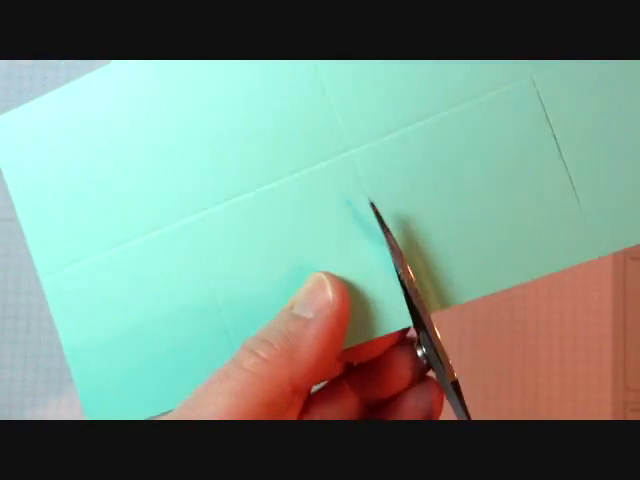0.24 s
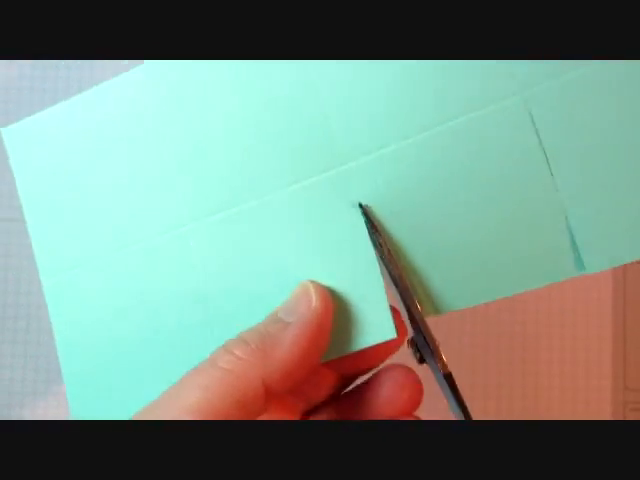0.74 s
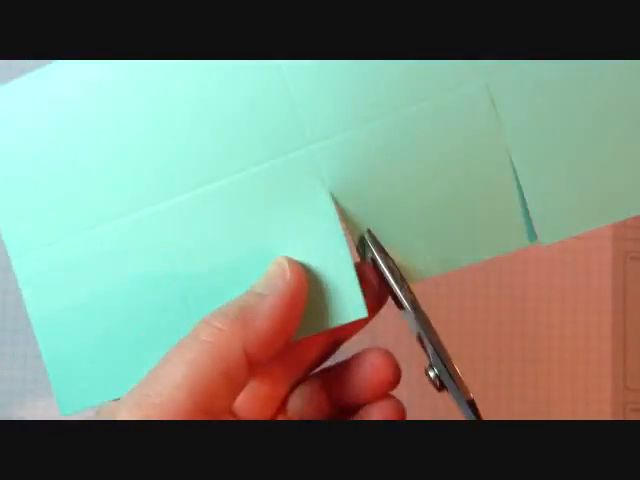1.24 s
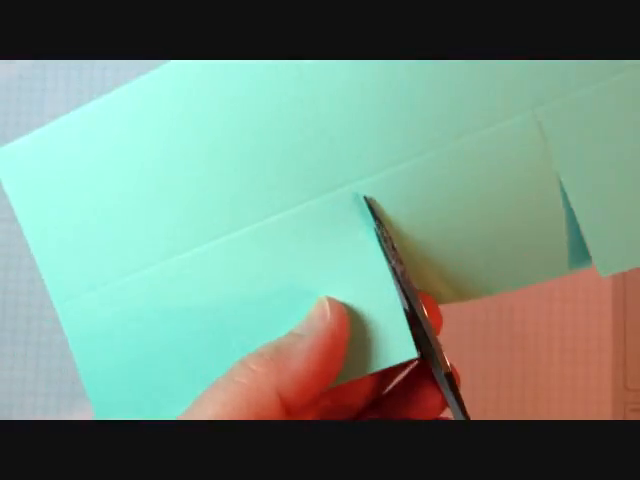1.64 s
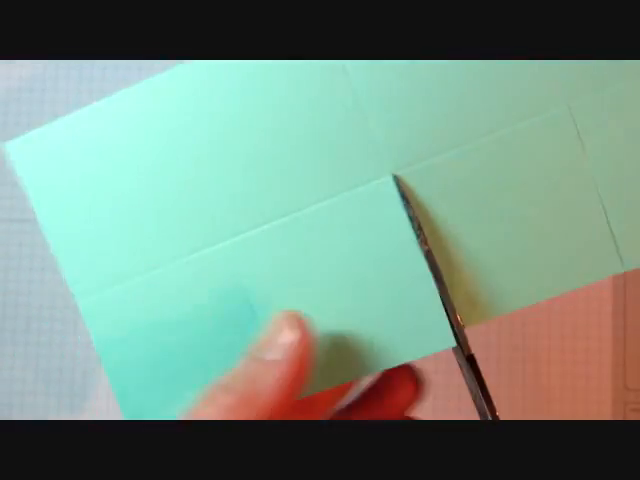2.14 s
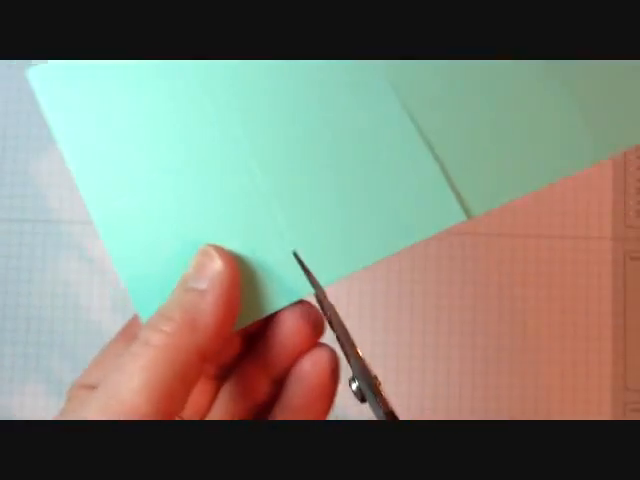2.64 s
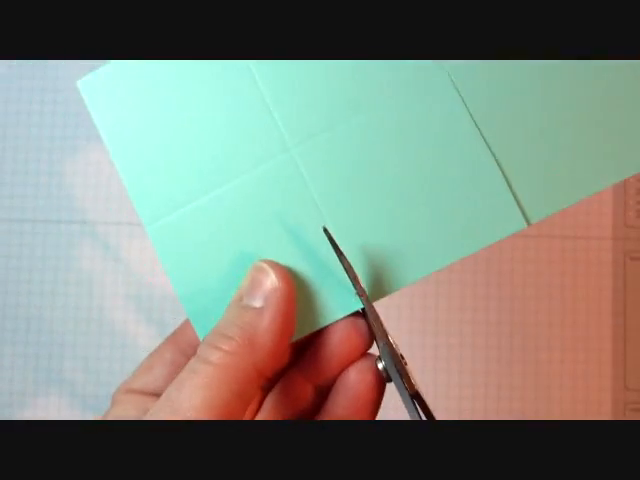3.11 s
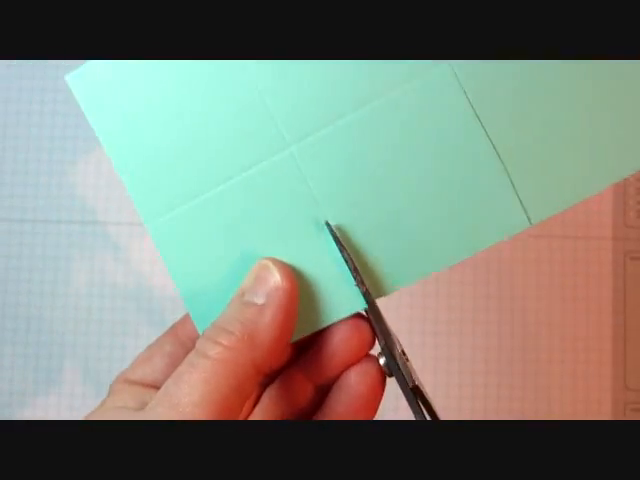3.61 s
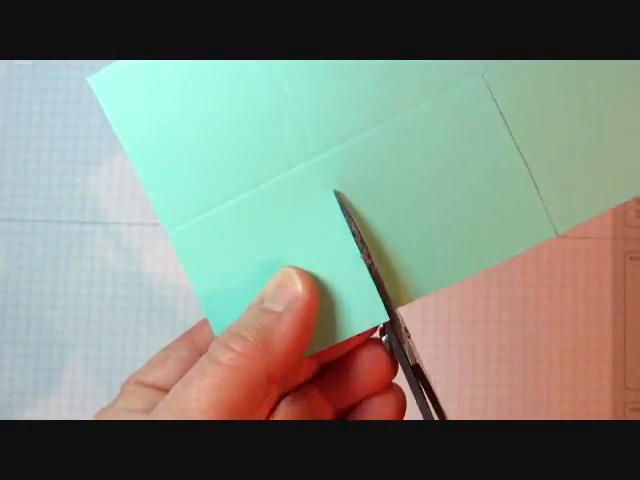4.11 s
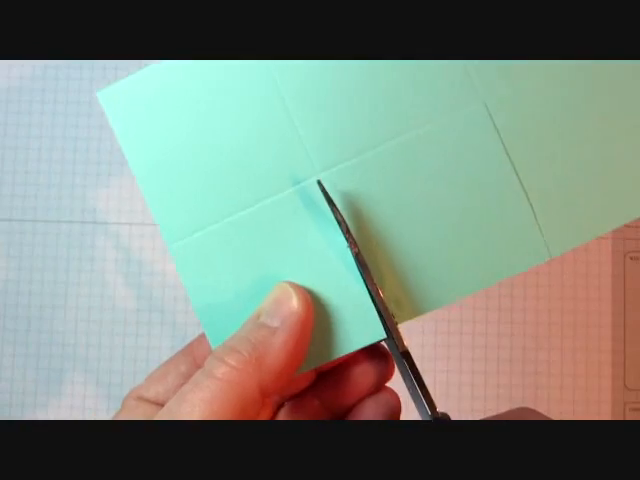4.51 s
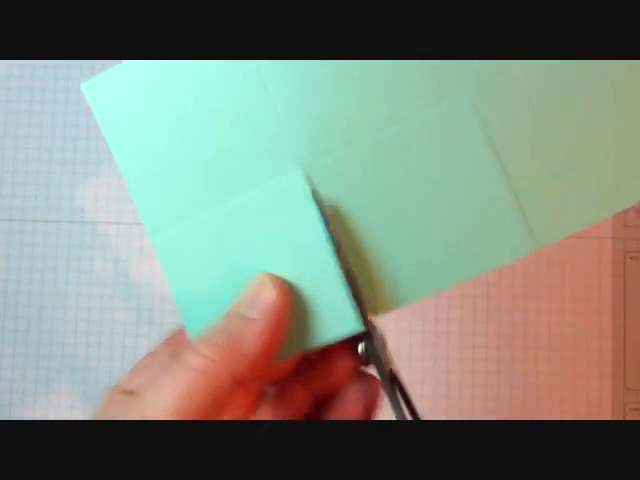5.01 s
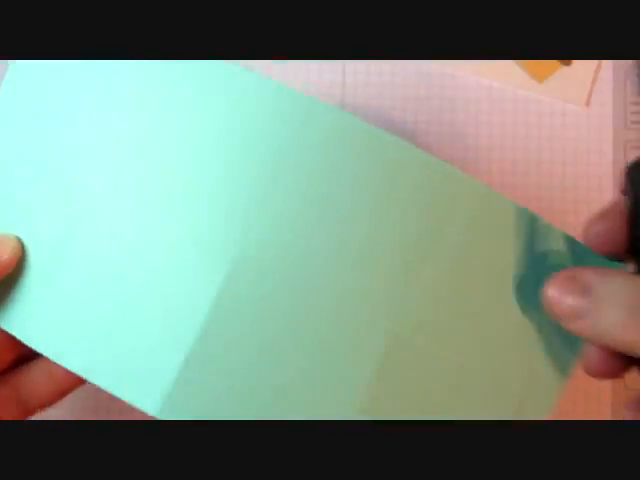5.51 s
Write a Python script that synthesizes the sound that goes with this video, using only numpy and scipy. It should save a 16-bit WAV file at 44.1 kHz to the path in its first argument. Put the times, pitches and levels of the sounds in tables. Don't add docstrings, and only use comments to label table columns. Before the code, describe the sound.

A close stereo pickup of scissors cutting stiff card at a table in a small room, with a very short diffuse echo. From 0 to 0.35 s, gritty crunching bites with papery squeaks; a small cut follows near 0.75. Around 0.9 to 1.3 the card rubs and the blades slide lightly with ticks. A crisp snap at 1.5 leads into dull scuffing and small cuts until 1.9, with a knock at 1.88. From 2.2 to 2.6 comes a dense run of rips and snaps, ending in low thuds of the bending sheet. It is nearly quiet from 2.9 to 3.5, with slight scrapes. A thin metallic rasp rises and falls at 3.55 to 3.75, then a very sharp crack at 3.92. More tearing follows around 4.2 to 4.3, the loudest snap at 4.45, faint rubbing, then crunchy cuts from 5.05 to 5.35 and a last light snip at 5.7. Faint hiss and very high whine persist throughout.

```python
import sys
import numpy as np
from scipy import signal
from scipy.fft import rfft, irfft
from scipy.io import wavfile
from scipy.ndimage import uniform_filter1d

SR = 44100
rng = np.random.default_rng(int(sys.argv[2]) if len(sys.argv) > 2 else 0)


def invert_db(level):
    return 10 ** (np.asarray(level, dtype=float) / 20)


def waveform_to_disk(signal):
    frames = np.transpose(np.atleast_2d(signal))
    scaled = np.clip(frames, -1, 1) * 32767
    samples = np.round(scaled).astype(np.int16)
    wavfile.write(sys.argv[1], SR, samples)


N = 253575


def unit(x):
    return x / np.sqrt(np.mean(x ** 2))


def shape_db(points, hz):
    point_hz, db = np.transpose(points)
    return np.interp(np.log(hz + 1), np.log(point_hz), db)


def bands(hz, centres_hz):
    return [np.interp(np.log(hz + 1), np.log(centres_hz), row) for row in np.eye(len(centres_hz))]


def walk(rate):
    k = int(SR / rate)
    held = np.repeat(rng.standard_normal(N // 20), k)[:N]
    return unit(uniform_filter1d(held, k))


def push(t, peak_s, rise_s, fall_s, db):
    rising = (peak_s - t) / max(rise_s, .002)
    falling = (t - peak_s) / max(fall_s, .002)
    away = np.where(t < peak_s, rising, falling)
    return invert_db(db - 23 * away ** 1.15) ** 2


def hiss(points, db):
    gain = invert_db(shape_db(points, np.fft.rfftfreq(N, 1 / SR)))
    return invert_db(db) * unit(irfft(rfft(rng.standard_normal(N)) * gain, N))


# [pitch_hz, level_db per Hz]
SIDE_HISS = [(15, -26), (25, -13), (64, -5), (97, -23), (134, -8.5), (384, -8.5), (575, -8.5), (936, -6.5),
             (1040, -7), (7920, -23.5), (16000, -33.5)]
# [pitch_hz, level_db per Hz]
MID_HISS = [(15, -22), (25, -6.5), (114, -10.5), (249, -6.5), (531, -13.5), (1190, -4.5), (1840, -13),
            (3250, -14), (4140, -14.5), (4490, -15.5), (16000, -24)]
# [pitch_hz, mid_db, side_db, start_turns]
WHINES = [
    (7866.8, -77, -77, 0),
    (15733.7, -75, -93, 0),
    (15747.8, -80, -98, .7),
]


def camera():
    turns = np.arange(N) / SR
    mid, side = hiss(MID_HISS, -57.5), hiss(SIDE_HISS, -46)
    for hz, mid_db, side_db, start_turns in WHINES:
        whine = np.sqrt(2) * np.sin(2 * np.pi * (hz * turns + start_turns))
        mid += invert_db(mid_db) * whine
        side += invert_db(side_db) * whine
    return mid, side


# [peak_s, rise_s, fall_s, level_db]
WRIST_LEANS = [(.9, .03, .15, -62), (1.02, .04, .06, -62), (1.18, .06, .1, -62), (1.51, .01, .2, -55),
               (1.65, .08, .15, -56), (2.75, .08, .1, -62), (4.1, .05, .08, -63), (4.455, .015, .2, -55),
               (5.14, .04, .05, -62), (4.68, .05, .08, -64), (5.74, .04, .05, -57)]


def leans():
    t = np.arange(N) / SR
    table = signal.butter(2, [80, 230], "bandpass", fs=SR, output="sos")
    rumble = unit(signal.sosfilt(table, rng.standard_normal(N)))
    power = sum(push(t[::100], *row) for row in WRIST_LEANS)
    return rumble * np.interp(t, t[::100], np.sqrt(power))


def echo(db, gap_s, top_hz):
    t, t60_s = np.arange(SR // 4) / SR, 0.14
    tail = rng.standard_normal(len(t)) * np.exp(-np.log(1000) * t / t60_s) * (t > gap_s)
    tail = signal.lfilter(*signal.butter(1, top_hz, fs=SR), tail)
    return invert_db(db) * tail / np.linalg.norm(tail)


# [time_s, resonance_hz, level_db]
BLADE_RASP = [
    (3.521, 3310, -64),
    (3.58, 3875, -45.5),
    (3.64, 4670, -45),
    (3.691, 5120, -41),
    (3.717, 4440, -44),
    (3.75, 4130, -68),
]


def rasp():
    time_s, hz, db = np.transpose(BLADE_RASP)
    t, width_hz = np.arange(N) / SR, 900
    rough = unit(signal.lfilter(*signal.butter(2, width_hz, fs=SR), rng.standard_normal(N)))
    turns = np.cumsum(np.interp(t, time_s, hz)) / SR
    return invert_db(np.interp(t, time_s, db, -120, -120)) * rough * np.sin(2 * np.pi * turns)


# [peak_s, rise_s, fall_s, peak_pitch_hz, level_db]
STRIP_SINGS = [(.272, .008, .01, 1600, -36), (.289, .005, .004, 3300, -33), (.137, .015, .02, 4100, -43),
               (.075, .03, .05, 600, -37), (2.237, .03, .02, 4200, -38), (2.298, .01, .015, 4200, -37),
               (2.325, .02, .015, 4300, -40), (2.356, .012, .02, 4150, -37), (4.25, .06, .08, 1300, -38),
               (4.26, .05, .07, 4600, -43), (1.63, .03, .03, 1700, -40), (1.725, .02, .04, 2200, -42),
               (1.73, .02, .04, 3300, -46), (1.865, .08, .025, 1300, -42), (1.85, .06, .04, 3000, -44),
               (1.89, .008, .06, 720, -42), (2.235, .03, .03, 870, -36), (2.298, .008, .045, 870, -34),
               (2.42, .04, .08, 420, -42), (2.555, .012, .01, 5900, -40), (2.576, .012, .045, 620, -27),
               (2.86, .008, .03, 560, -46), (3.875, .02, .04, 1450, -43), (3.94, .02, .04, 3400, -42),
               (3.965, .04, .04, 1000, -42), (4.025, .015, .04, 2000, -42), (4.475, .03, .04, 2200, -36),
               (5.075, .015, .04, 1230, -36), (5.14, .04, .04, 800, -36), (5.1, .02, .02, 1100, -37),
               (1.59, .06, .06, 4600, -44), (1.53, .03, .04, 1400, -40), (2.355, .01, .03, 900, -35),
               (1.77, .015, .012, 1300, -32), (5.117, .01, .015, 1750, -35), (5.27, .02, .04, 1300, -40),
               (5.31, .02, .03, 1250, -35), (5.355, .02, .02, 2350, -42)]


def sings():
    sag_per_s, width_hz = 1.2, 230
    t, out = np.arange(-SR // 8, SR // 8) / SR, np.zeros(N + SR)
    noise = rng.standard_normal((len(STRIP_SINGS), len(t)))
    rough = unit(signal.lfilter(*signal.butter(2, width_hz, fs=SR), noise))
    for (peak_s, rise_s, fall_s, hz, db), grain in zip(STRIP_SINGS, rough):
        i = int(peak_s * SR)
        turns = np.cumsum(hz * np.exp(-sag_per_s * t)) / SR
        swell = np.sqrt(2 * push(t, 0, rise_s, fall_s, db))
        out[i:i + len(t)] += swell * grain * np.sin(2 * np.pi * turns)
    return out[SR // 8:N + SR // 8]


# [peak_s, rise_s, fall_s, card_db, blades_over_card_db]
CUT_STROKES = [(.07, 0.062, 0.12, -32.5, -2), (.14, 0.12, 0.04, -43, 7.5), (.28, 0.027, .04, -38.5, 1),
               (.456, 0.071, 0.31, -54, -5), (.682, 0.046, 0.1, -56, 7), (.775, 0.028, 0.067, -38, 2.5),
               (1.775, 0.025, 0.008, -39, 11.5), (2.23, 0.075, 0.12, -39, 1), (2.325, .04, .02, -39, 7),
               (2.385, 0.1, 0.16, -39, 2), (2.57, .02, 0.013, -36, 6), (2.59, 0.018, 0.082, -42.5, 3.5),
               (3.87, .03, 0.15, -45.5, 4.5), (3.913, 0.0057, 0.14, -35.5, 4),
               (4.22, 0.033, 0.16, -37.5, 3), (4.316, 0.2, 0.014, -36, 3),
               (4.445, 0.057, 0.022, -38.5, -1.5), (4.454, 0.004, 0.019, -29, 4),
               (4.495, 0.015, 0.2, -44, 1.5), (5.075, 0.022, 0.058, -39.5, 1.5),
               (5.135, 0.057, 0.044, -34, 0), (5.304, 0.078, 0.08, -35.5, -1.5),
               (5.346, 0.031, 0.03, -37, 4.5), (5.75, 0.033, .05, -40, 11)]
# [peak_s, rise_s, fall_s, card_db, blades_over_card_db]
SLIDE_STROKES = [(1.075, .04, .04, -50, 8), (1.118, 0.071, 0.035, -49, 14.5), (1.2, .025, 0.024, -40, 6.5),
                 (1.28, 0.049, 0.046, -52.5, 7), (2.858, .012, .03, -48, 4), (2.9, 0.024, 0.1, -44.5, -9),
                 (3.234, 0.24, 0.26, -55.5, -8), (3.57, 0.087, 0.16, -46.5, -7),
                 (3.682, 0.16, 0.13, -39.5, 1.5), (3.76, 0.064, 0.031, -42.5, 2.5),
                 (2.51, .02, .06, -43, -2), (4.56, 0.087, 0.11, -52, 6.5), (4.75, 0.15, 0.087, -48.5, 2.5),
                 (5.55, 0.42, 0.36, -56, -1.5)]
# [peak_s, rise_s, fall_s, card_db, blades_over_card_db]
RUB_STROKES = [(.885, 0.01, 0.054, -39.5, 1), (1.04, 0.085, 0.18, -47.5, -10), (1.21, 0.15, 0.14, -44, 2),
               (1.503, 0.0057, 0.19, -37.5, -1), (1.56, .1, 0.19, -43, 9), (1.6, .06, .06, -44, 9),
               (1.645, 0.08, 0.02, -42, 6.5), (1.72, .03, 0.034, -44.5, 11), (1.82, 0.062, 0.16, -45, 6),
               (1.875, 0.13, 0.03, -38, 1), (1.98, 0.046, 0.16, -43, -4.5), (2.668, .012, 0.054, -46, 3.5),
               (4.03, 0.12, 0.072, -43.5, -3.5), (4.12, 0.096, 0.16, -52, 2), (4.64, 0.11, 0.3, -50, 3.5),
               (4.866, 0.027, 0.084, -56.5, 2), (5.02, .15, 0.044, -50.5, -3),
               (5.262, 0.023, .06, -38.5, 0.5)]
# [peak_s, rise_s, fall_s, level_db]
SHEET_BENDS = [(.12, 0.14, .08, -42), (.273, .015, 0.052, -41.5), (.69, 0.015, .05, -46.5),
               (.89, .02, 0.067, -57), (1.1, 0.1, 0.055, -45.5), (1.505, .008, 0.14, -46),
               (1.68, 0.2, 0.3, -45), (1.868, 0.064, 0.25, -44), (2.388, 0.031, 0.19, -35),
               (2.58, 0.1, 0.05, -32), (2.7, 0.088, .15, -51.5), (2.772, .008, 0.069, -49),
               (3.234, 0.071, 0.12, -55), (3.92, .02, 0.33, -41.5), (4.453, 0.006, 0.026, -31),
               (4.56, .08, 0.21, -50.5), (4.86, 0.033, 0.03, -49.5), (5.03, 0.18, 0.027, -58),
               (5.3, 0.043, 0.09, -41), (5.678, 0.03, .04, -53)]


def effort(t):
    power = np.zeros((4, len(t)))
    for strokes, fibre_db in [(CUT_STROKES, -7), (SLIDE_STROKES, -3), (RUB_STROKES, -17)]:
        for peak_s, rise_s, fall_s, db, blade_db in strokes:
            shares = invert_db([-11.5, 0, blade_db, blade_db + fibre_db]) ** 2
            power += shares[:, None] * push(t, peak_s, rise_s, fall_s, db - 5.5)
    for peak_s, rise_s, fall_s, db in SHEET_BENDS:
        power[0] += push(t, peak_s, rise_s, fall_s, db - 4.5)
    return np.sqrt(power)


def fibres(grit, rate, spread_db, stick_db, grind):
    when, sign = rng.random(N), rng.standard_normal(N)
    size_db = spread_db * np.minimum(rng.exponential(size=N), 1.8)
    clicks = (when < rate / SR) * sign * invert_db(size_db)
    force = grit * unit(clicks) + grind * rng.standard_normal(N)
    bunching_db = grit * stick_db * (walk(120) + 0.067 * walk(40))
    return force / np.hypot(grit, grind) * invert_db(bunching_db)


def causal(db):
    c = irfft(db * np.log(10) / 20)
    c[1:len(c) // 2] *= 2
    c[len(c) // 2 + 1:] = 0
    return irfft(np.exp(rfft(c)))[:len(c) // 2]


# [pitch_hz, level_db per Hz]
TEAR_COLOUR = [(59, -24.5), (100, -21), (255, -14.5), (335, -4.5), (502, -6), (872, 1), (1050, -.5),
               (1300, 1), (1610, -2), (2000, -5.5), (7770, -14), (16000, -29)]
# [pitch_hz, width_hz, lift_db]
BODY_MODES = [(345, 45, 5), (455, 55, 3.5), (628, 100, 2.5), (778, 60, 2.5), (885, 70, 3), (1233, 100, 3),
              (1400, 100, 2), (1830, 160, 2.5), (2110, 120, 2), (2400, 180, 2), (3200, 200, 2),
              (3580, 120, 2.5), (4110, 150, 2.5)]
PART_CENTRES = [
    260,
    1000,
    3300,
    8000,
]
LEAD = 256


def bodies():
    hz = np.fft.rfftfreq(4096, 1 / SR)
    lift_db = sum(db / (1 + (2 * (hz - f) / width) ** 2) for f, width, db in BODY_MODES)
    whole = rfft(causal(shape_db(TEAR_COLOUR, hz) + lift_db), 4096)
    parts = [np.roll(irfft(whole * share), LEAD) for share in bands(hz, PART_CENTRES)]
    return [p / np.linalg.norm(p) for p in parts]


# [start_s, peak_db, flap_pitch_hz, fibre_db]
CLEAN_TICKS = [(1.683, -24, 2000, 0), (2.5355, -17, 3050, 2), (3.9219, -5, 3300, 3), (2.398, -22, 2500, 4),
               (1.2, -26, 3000, 0), (.107, -24, 1790, -4), (.461, -30.5, 1320, -27),
               (0.8807, -21, 2740, -54), (.895, -29, 2500, -25), (1.055, -33, 2150, -20),
               (1.2025, -28, 3280, -14), (2.493, -12.5, 2200, -1.5), (1.4995, -14.5, 1500, 0),
               (1.4997, -22, 4600, -5), (1.8808, -11.5, 800, -14), (1.8812, -23, 2600, -25),
               (4.271, -18.5, 1290, 5), (4.235, -28, 2200, -10), (3.687, -19, 4020, -14),
               (3.729, -29, 786, -9), (3.9117, -9.5, 3580, -13), (4.026, -18, 2070, -39),
               (4.093, -19, 1590, -4), (4.4511, -1.5, 1500, -6), (4.4516, -12, 4400, -10),
               (4.48, -21, 2020, -21), (4.4858, -11, 2170, -28), (4.664, -26, 1520, -30),
               (4.855, -31, 1750, -40), (5.062, -33, 1910, -9), (5.707, -24.5, 4450, -22)]
# [start_s, peak_db, flap_pitch_hz, fibre_db]
SPRAY_SNAPS = [(.034, -31, 2130, -29), (.071, -19, 710, -13), (.129, -22.5, 1190, -24),
               (.154, -28, 1570, -19), (0.2772, -14.5, 1090, -25), (.288, -26, 3200, 0),
               (.692, -24, 800, -2), (.714, -28, 1210, -15), (.843, -34, 1340, -10),
               (.9965, -29.5, 790, -30), (.758, -31, 1500, -13), (1.755, -23, 1725, -12),
               (1.762, -17, 1370, -8), (4.322, -16, 780, -23), (1.963, -32, 1760, -29),
               (.27, -24, 900, -20), (1.647, -30, 800, -6), (2.571, -13, 630, -20), (2.53, -19, 1290, -6),
               (3.978, -24, 1500, -6), (4.016, -30, 2400, -8), (2.509, -28, 2200, -15),
               (4.504, -27, 2600, -12), (4.512, -27, 2500, -6), (5.125, -20, 880, -15),
               (4.134, -31, 800, -18), (4.152, -24, 1320, -6), (4.2, -25.5, 1010, -12),
               (5.146, -20, 925, -13), (2.52, -27, 1500, -2), (5.308, -17.5, 1240, -9),
               (5.338, -18, 1360, -6), (5.667, -28.5, 3740, -21), (5.729, -26, 1480, -13)]
# [start_s, peak_db, flap_pitch_hz, fibre_db, t60_s]
LONG_RIPS = [(.061, -31, 869, -14, 0.029), (.771, -22.5, 1230, -2, 0.055), (2.857, -32, 850, -2, 0.044),
             (1.771, -25, 1380, -0.5, 0.03), (2.196, -30.5, 860, -27, .039), (2.209, -32, 1730, -9, 0.048),
             (2.236, -23, 1410, -10, 0.04), (2.266, -25.5, 1490, -5, 0.042), (2.297, -17, 880, -13, 0.044),
             (2.354, -20.5, 910, -10, 0.04), (2.392, -25, 1400, -10, 0.04), (2.541, -28, 1100, -4, 0.05),
             (2.568, -17, 1800, -2, .03), (3.97, -26, 1000, -4, .03), (3.925, -29, 3300, -2, .03),
             (2.718, -38.5, 1530, -6, .048), (3.75, -32, 900, -3, 0.042), (3.86, -39.5, 1390, 2, 0.085),
             (4.301, -27.5, 1230, -1.5, 0.033), (2.555, -19, 1830, -9, 0.017),
             (4.432, -35.5, 2300, -7, 0.16), (4.509, -34.5, 2520, -4, 0.04), (4.646, -30, 2280, -30, 0.019),
             (5.019, -41.5, 1410, -23, 0.071), (5.067, -29, 1220, -2.5, 0.035),
             (5.095, -27.5, 1170, -9, 0.066), (5.116, -27.5, 836, -8.5, 0.07)]


def snaps():
    jolt_db, thud_db = -29, -15
    hum_db, hum_width = -7.5, 0.14
    force, flap, t = np.zeros((4, N + SR)), np.zeros(N + SR), np.arange(SR // 8) / SR
    shower = rng.standard_normal(N + SR) * invert_db(0.46 * rng.standard_normal(N + SR))
    # t60_s, shower_db, rise_s (how fast the break opens)
    breaks = [(*row, 0.026, -20, .0001) for row in CLEAN_TICKS]
    breaks += [(*row, 0.044, -14, 0.0008) for row in SPRAY_SNAPS]
    breaks += [(*row, -5.5, .0055) for row in LONG_RIPS]
    for start_s, db, hz, fibre_db, t60_s, shower_db, rise_s in breaks:
        i = int((start_s - rise_s) * SR)
        span = slice(i, i + len(t))
        opening = 1 - np.exp(-(t / max(rise_s, 1 / SR)) ** 2)
        late = np.maximum(t - rise_s, 0)
        fade = np.log(1000) * late / max(t60_s, .004)
        tone = np.sin(2 * np.pi * hz * t) + 0.16 * np.sin(2 * np.pi * 1.584 * hz * t)
        flap[span] += invert_db(db) * opening * np.exp(-late * hz) * tone
        spray = invert_db(db + shower_db + hum_db) * shower[span] * opening * np.exp(-fade)
        hum = signal.lfilter(*signal.iirpeak(hz, 1 / hum_width, SR), spray)
        flap[span] += hum * np.sqrt(SR / (np.pi * hum_width * hz))
        tilt_db = 5 * np.log2(hz / 1600)
        levels_db = [thud_db, -max(tilt_db, 0), min(tilt_db, 0), fibre_db]
        for k, (rel_db, quick) in enumerate(zip(levels_db, [.8, 1, 1.3, 1.8])):
            burst = invert_db(shower_db) * shower[span] * opening * np.exp(-quick * fade)
            burst[int(rise_s * SR)] = invert_db(jolt_db)
            force[k, span] += invert_db(db + rel_db) * burst
    return force[:, :N], flap[:N]


def patchy(x, patchy_db=2.5, rate=45):
    hz, spectrum = np.fft.rfftfreq(N, 1 / SR), rfft(x)
    shares = bands(hz, np.geomspace(200, 12000, 14))
    return sum(irfft(spectrum * share, N) * invert_db(patchy_db * walk(rate)) for share in shares)


# [time_s, grit: 0 smooth slide to 1 stick and slip]
BLADE_GRIT = [(0, 0.31), (.9, .6), (1.1, 0.29), (1.5, 0.25), (1.7, 0.35), (2.2, 0.4), (2.7, 0.6),
              (3.0, 0.2), (3.65, 0.22), (3.8, 0.35), (4.2, 0.41), (4.7, 0.26), (5.1, 0.36), (5.75, 0.52)]


def cutting():
    t = np.arange(N) / SR
    drive = np.array([np.interp(t, t[::100], row) for row in effort(t[::100])])
    grit = np.clip(np.interp(t, *np.transpose(BLADE_GRIT)), 0, 1)
    jolts, flap = snaps()
    force = drive * fibres(grit, rate=1800, spread_db=4, stick_db=4, grind=.55) + jolts
    sound = sum(signal.fftconvolve(f, h)[LEAD:N + LEAD] for f, h in zip(force, bodies()))
    table_filter = signal.butter(1, [60, 210], "bandpass", fs=SR)
    table = signal.lfilter(*table_filter, force[0] + 0.12 * force[1])
    flap = signal.sosfilt(signal.butter(2, 600, "highpass", fs=SR, output="sos"), flap)
    return patchy(sound) + flap + rasp() + invert_db(-6) * table


def scene():
    mid, side = camera()
    near = cutting() + sings()
    mid_tail = echo(-12.5, gap_s=0.00103, top_hz=6600)
    side_tail = echo(-19.5, gap_s=0.0001, top_hz=15000)
    mid = mid + near + leans() + signal.fftconvolve(near, mid_tail)[:N]
    side = side + signal.fftconvolve(near, side_tail)[:N]
    return np.array([mid + side, mid - side])


def band_limit(x):
    return signal.sosfilt(signal.butter(12, 16650, fs=SR, output="sos"), x)


def record(dry):
    rounded = np.tanh(1.3 * dry) / 1.3
    low_pass = signal.ellip(10, .5, 45, 15800, fs=SR, output="sos")
    return band_limit(signal.sosfilt(low_pass, rounded))


dry = scene()
out = record(dry)
waveform_to_disk(out)
```